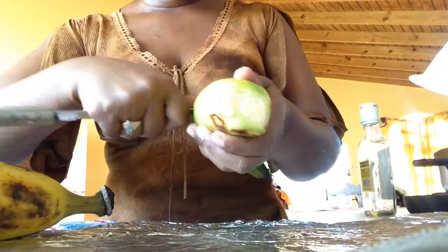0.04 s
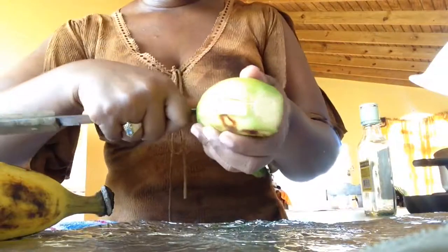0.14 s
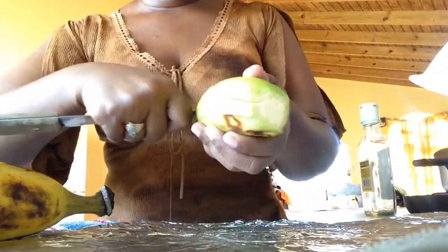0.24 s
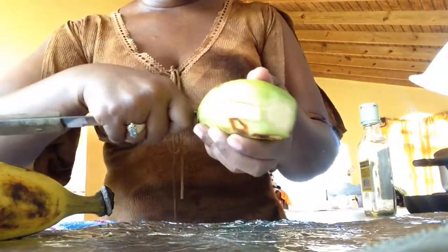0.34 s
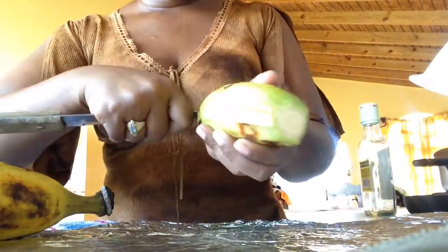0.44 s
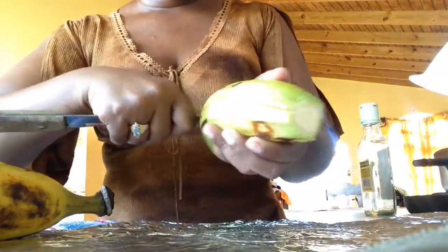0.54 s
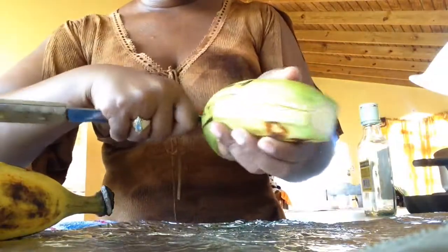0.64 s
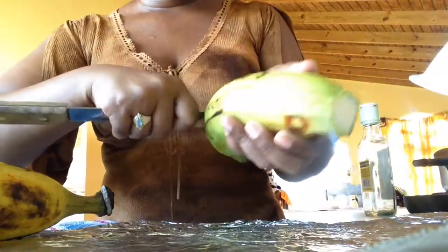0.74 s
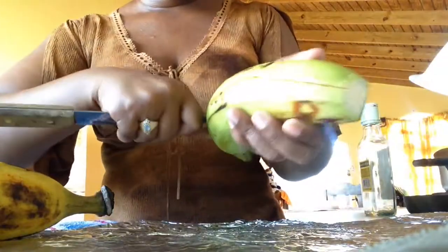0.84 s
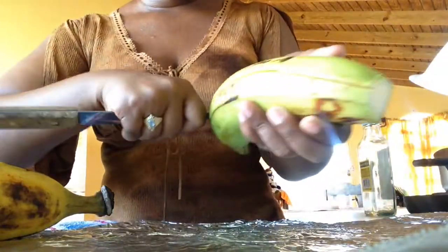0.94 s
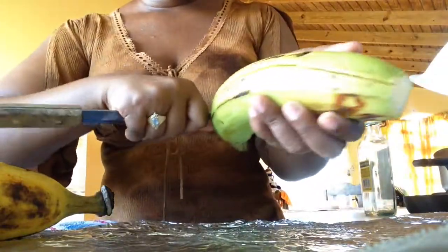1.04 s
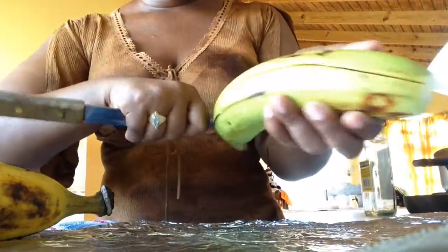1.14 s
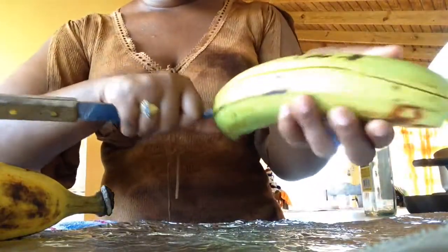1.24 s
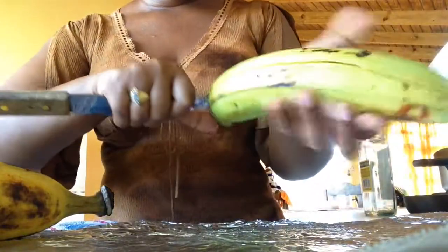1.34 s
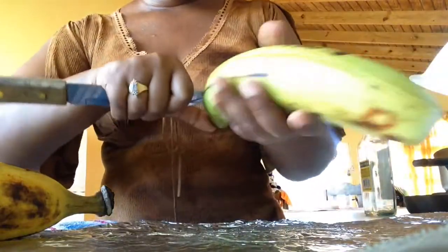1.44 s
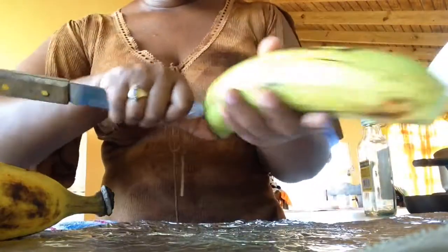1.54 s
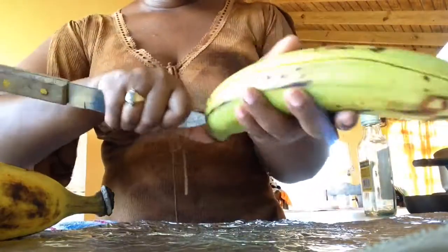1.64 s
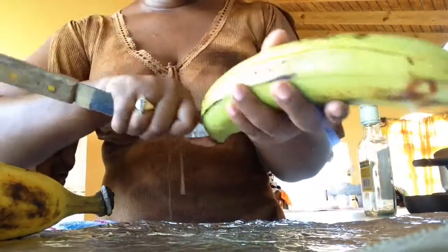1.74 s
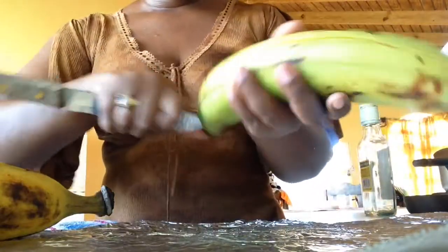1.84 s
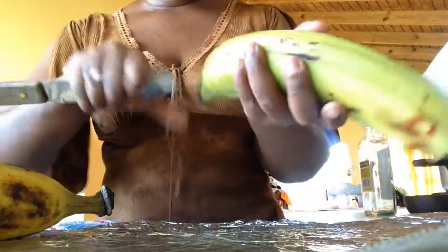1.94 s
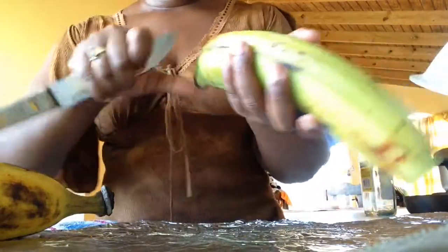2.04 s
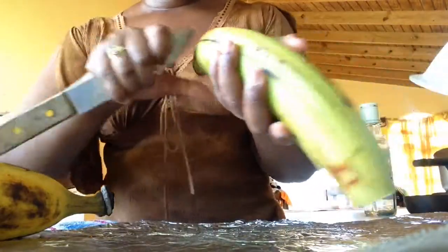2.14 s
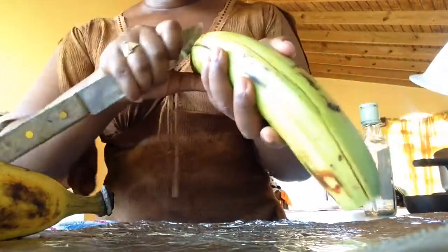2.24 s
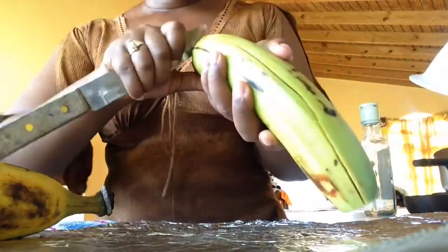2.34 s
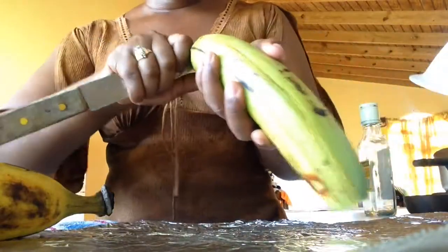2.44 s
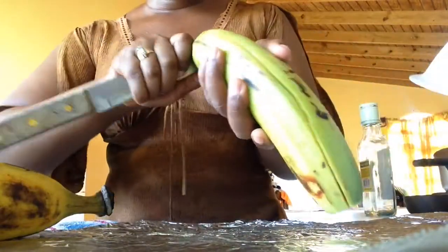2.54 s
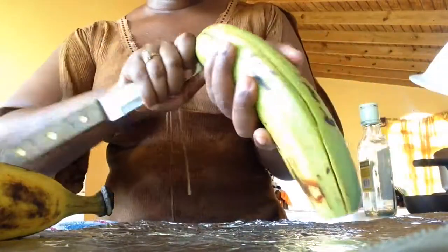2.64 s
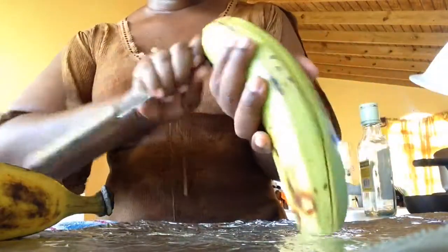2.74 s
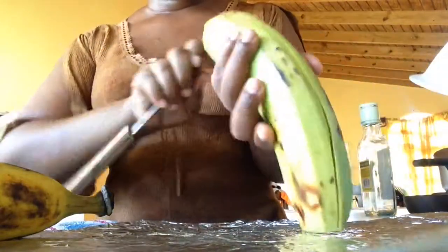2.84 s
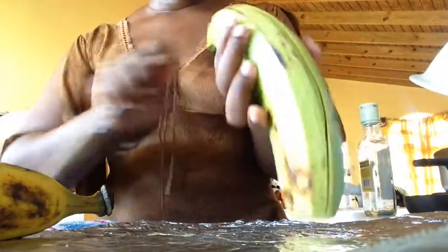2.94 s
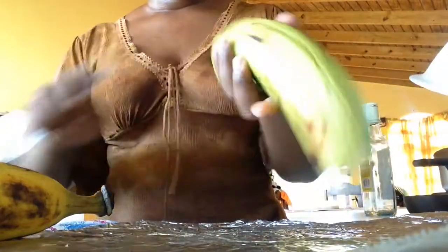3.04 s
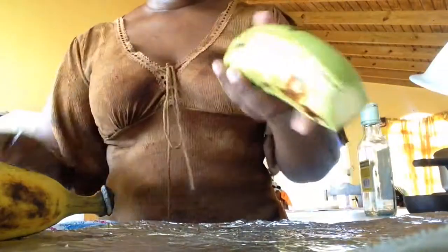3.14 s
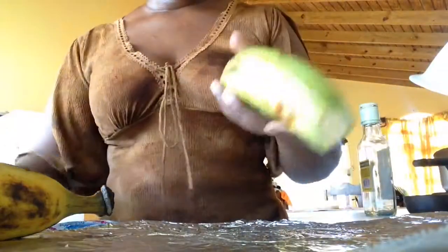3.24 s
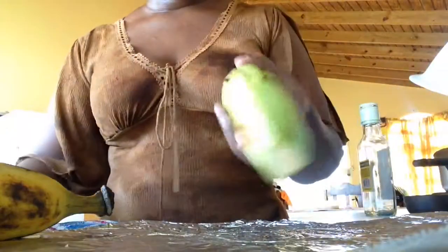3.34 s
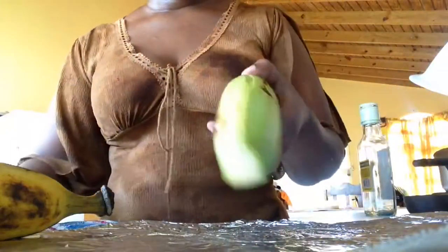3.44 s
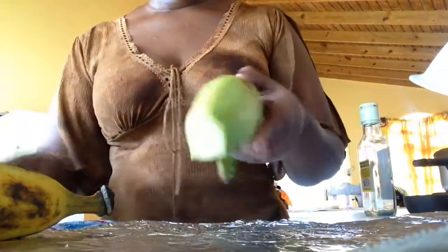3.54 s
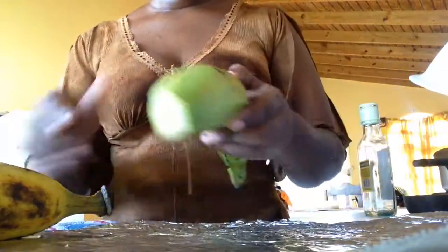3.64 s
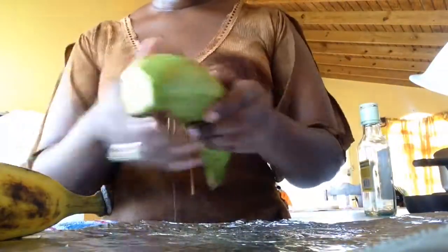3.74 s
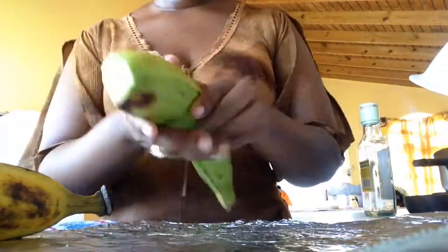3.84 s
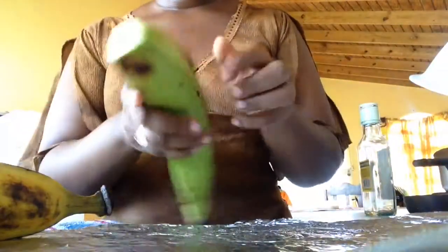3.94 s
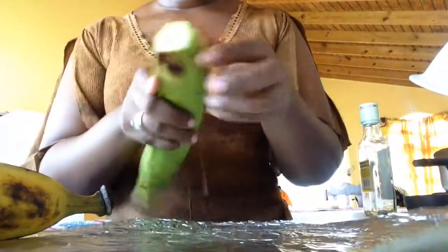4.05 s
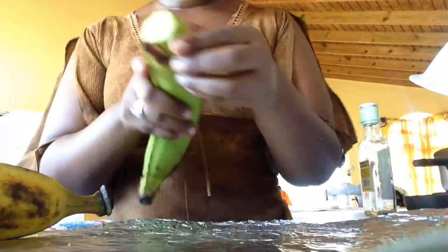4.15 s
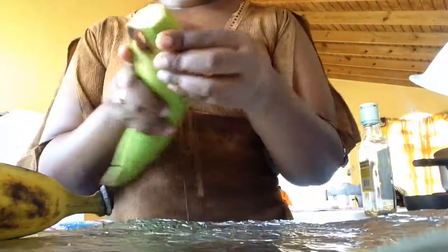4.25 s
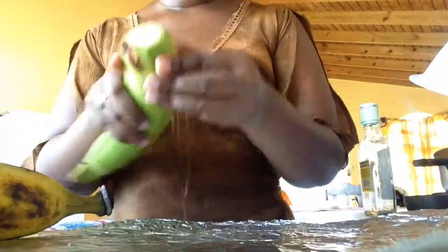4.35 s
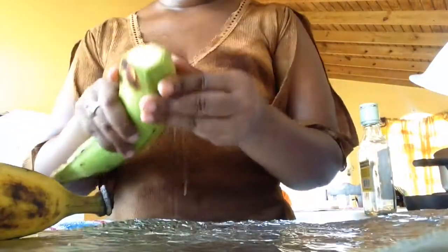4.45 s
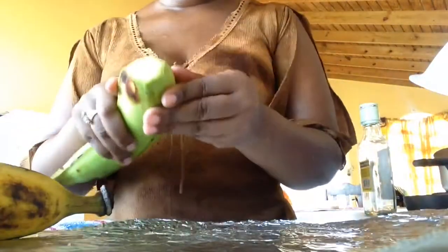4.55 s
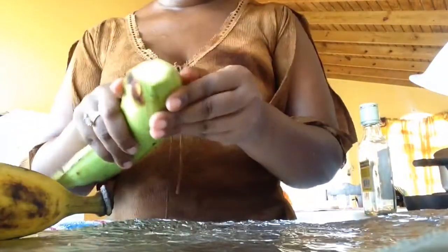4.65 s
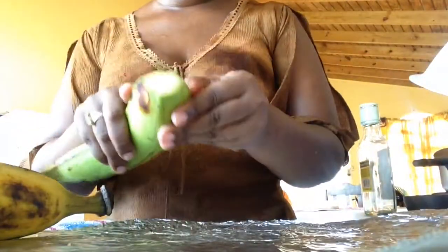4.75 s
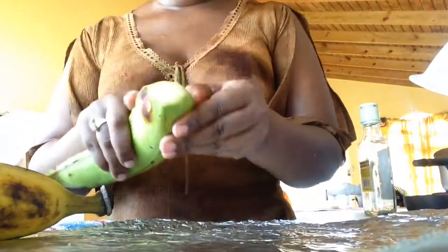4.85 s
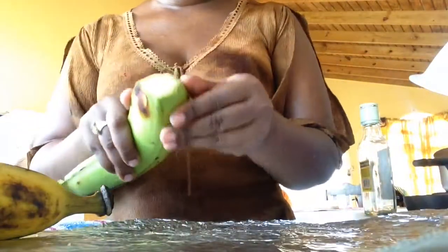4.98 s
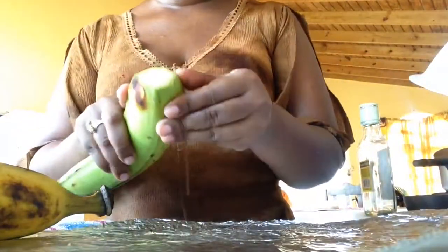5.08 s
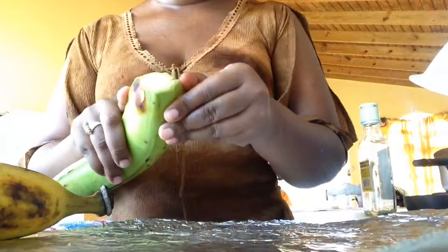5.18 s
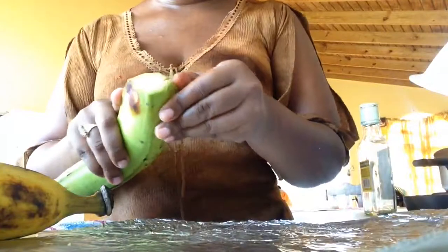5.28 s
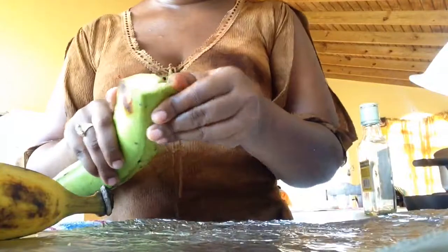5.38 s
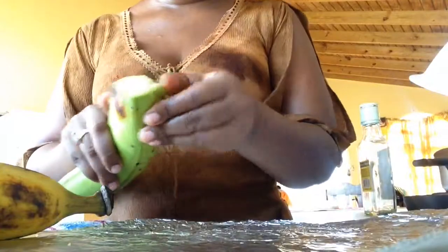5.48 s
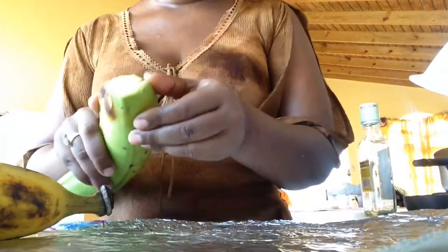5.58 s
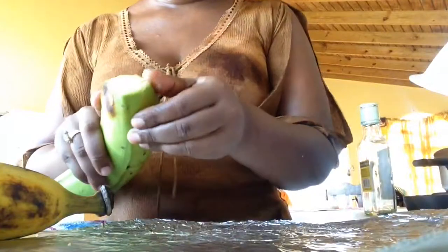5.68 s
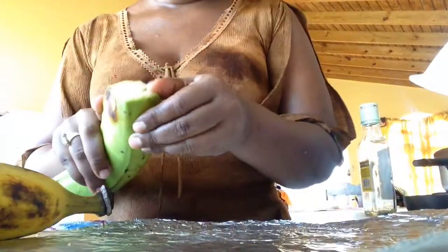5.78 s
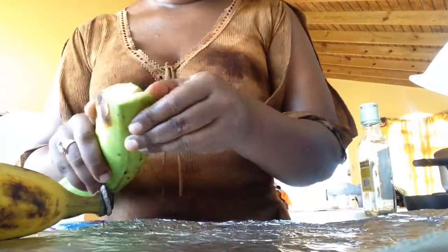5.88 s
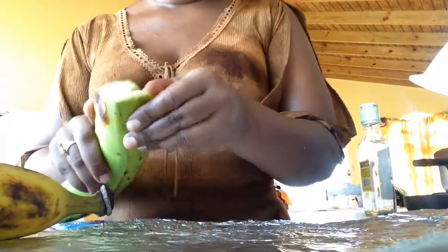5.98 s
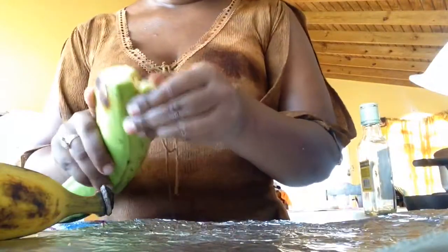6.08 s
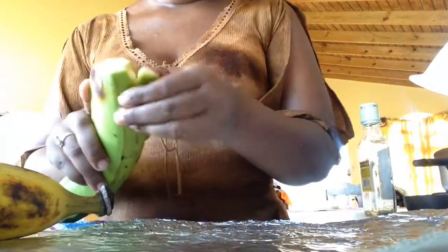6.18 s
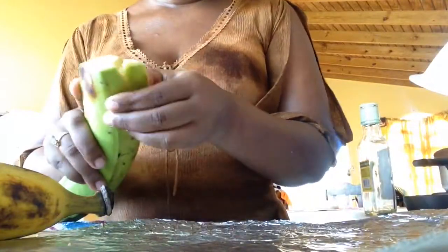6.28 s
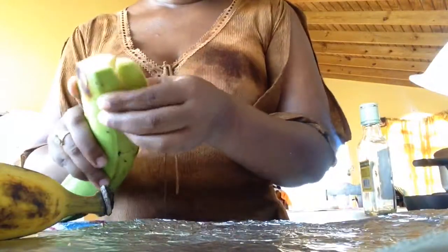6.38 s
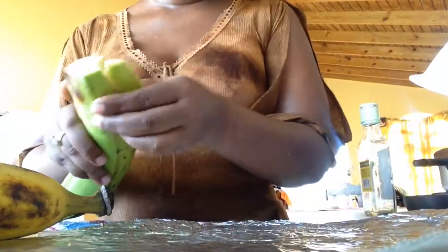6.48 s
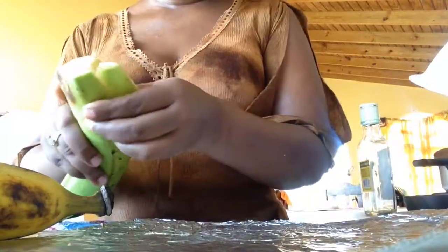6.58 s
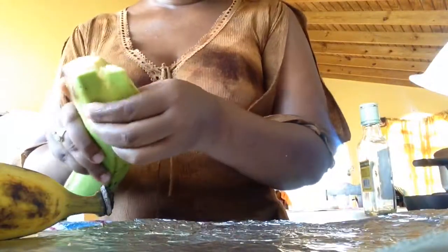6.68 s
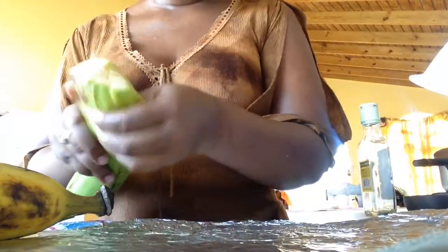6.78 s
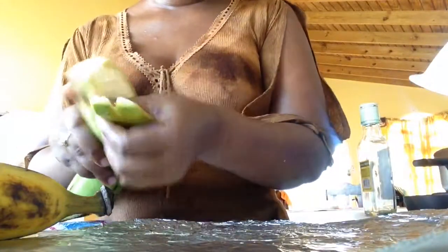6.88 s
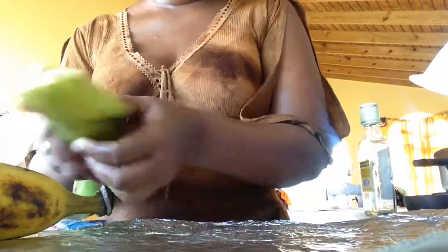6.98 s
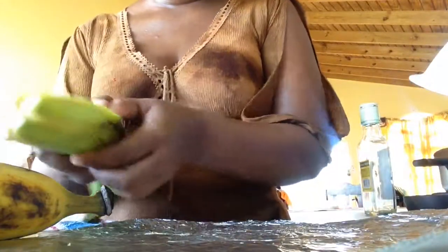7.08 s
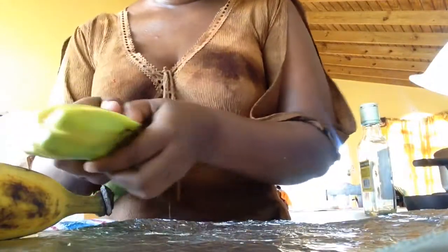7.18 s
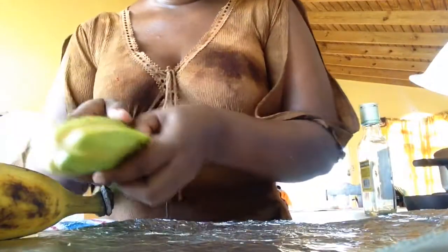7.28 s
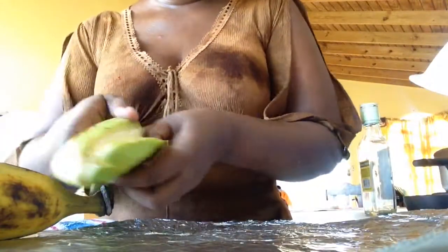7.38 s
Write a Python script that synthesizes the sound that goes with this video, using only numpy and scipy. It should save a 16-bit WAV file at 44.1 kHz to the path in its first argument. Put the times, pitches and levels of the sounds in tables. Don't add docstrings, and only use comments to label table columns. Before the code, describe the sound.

Close, dry scraping and snapping of thick peel in a quiet humming kitchen, interrupted by one loud cluster of wooden knocks and knife clatter.

```python
import sys
import numpy as np
from scipy import signal
from scipy.fft import rfft, irfft
from scipy.io import wavfile
from scipy.ndimage import uniform_filter1d

SR = 44100
rng = np.random.default_rng(int(sys.argv[2]) if len(sys.argv) > 2 else 0)


def elevation(decibels):
    levels = np.asarray(decibels, float)
    return 10 ** (levels / 20)


def transcribe(signal):
    frames = np.atleast_2d(signal).T
    limited = np.clip(frames, -1, 1)
    pcm = np.round(limited * 32767).astype(np.int16)
    wavfile.write(sys.argv[1], SR, pcm)


N = 327222

# frequency in [Hz], density in [dB per Hz].
HUM_SPECTRUM = [(15, -39), (25, -19), (108, 1), (195, -20), (451, -11.5), (659, -16.5), (1230, -20),
                (1610, -29), (1940, -25), (2910, -38), (3250, -30), (4030, -42.5), (5430, -36.5),
                (8140, -39.5), (16000, -38.5)]
# time in [s], gain in [dB].
STREET_SWELL = [(0, 0), (2, -2.2), (4.3, 1.1), (5, -0.6), (7.42, 0.4)]
# peak in [s], rise in [s], fall in [s], level in [dB].
WHIRR_SWELLS = [
    (.6, .7, .7, -80),
    (4.5, .6, 0.44, -79.5),
    (6.0, 0.96, .9, -79),
    (7.0, .6, .7, -72.5),
]
# frequency in [Hz], t60 in [s].
KITCHEN_T60 = [(80, .25), (150, 0.6), (400, 0.4), (1500, 0.27), (5000, 0.21), (14000, 0.26)]
# start in [s], peak in [dB], sway in [dB], upper modes in [dB],
# foil rattle in [dB].
TABLE_BLOWS = [
    (3.3876, -12, -15, -11, -12),
    (3.405, -14.5, -24, -10, -13),
    (3.419, -19, -16, -11, -9),
    (3.45, -23, -25, -12, -30),
    (3.478, -27.5, -12.5, -9.5, -6),
    (3.551, -15.5, -19, -10.5, -11),
    (3.6, -30, -20, -10, -30),
    (3.63, -36, -19, -21.5, -34),
    (3.986, -27, -24, -1, 0),
    (4.012, -28, -24, -8, -5),
]
# start in [s], peak in [dB], sway in [dB], upper modes in [dB],
# sway frequency in [Hz].
FRAME_BUMPS = [
    (1.705, -40, -6, -3, 90),
    (1.7135, -29, -2, -12, 62),
    (1.727, -32, -9, 0.5, 56.5),
    (2.845, -53, 8, -27, 73),
    (7.388, -59, -4, -16, 101),
]
# frequency in [Hz], level in [dB], t60 in [s].
TABLE_MODES = [(107, -2, .1), (191, -7, .08), (224, -8, .057), (266, -3, .06), (331, 1, .07), (352, 0, .05),
               (414, -5, .05), (461, -4, .07), (507, -7, .08), (590, -9, .06), (665, -9, .06),
               (726, -10, .06), (835, -11, .07), (1003, -13, .07)]
# frequency in [Hz], density in [dB per Hz].
UPPER_MODES = [(450, -22), (650, 2.5), (1000, -2), (1500, -11.5), (2200, -23), (3500, -30.5), (7000, -54)]
# frequency in [Hz], density in [dB per Hz].
FOIL_SPECTRUM = [(1500, -24), (2500, -14), (5300, -3.5), (9000, -7.5), (16000, -4.5)]
# start in [s], peak in [dB], frequency in [Hz], swell in [s].
HOLLOW_PUNCHES = [(3.3878, -11.5, 355, .007), (3.389, -35, 1007, .009), (3.404, -31, 790, .008),
                  (3.399, -22, 270, .01), (3.405, -26, 560, .008), (3.448, -27, 460, .008),
                  (3.5535, -26, 370, .008), (3.554, -35, 1170, .009), (3.574, -30, 290, .008),
                  (3.627, -35, 330, .008), (3.989, -33, 460, .012), (4.058, -36, 440, .008),
                  (1.766, -40, 1000, .004), (1.77, -39, 760, .014), (1.71, -42, 400, .012)]
# start in [s], peak in [dB], brightness in [dB per octave].
HANDLE_KNOCKS = [
    (1.727, -18, 2),
    (1.766, -24, -4.5),
    (1.776, -27, -3),
    (2.909, -49, -5),
]
# start in [s], peak in [dB], brightness in [dB per octave].
KNIFE_LANDING = [
    (3.551, -26.5, -0.5),
    (3.561, -31, 2.5),
    (3.576, -35, -1),
    (3.592, -40, 0),
    (3.627, -43.5, -1),
    (3.641, -48, 2),
]
# frequency in [Hz], level in [dB], t60 in [s].
HELD_KNIFE_MODES = [(750, 1, 0.09), (823, -1, 0.08), (1310, -5, .06), (1460, -6, 0.06), (1820, -3, 0.05),
                    (2200, -6, 0.06), (2900, 3, 0.022), (3900, -3, 0.03), (4700, -26, 0.075),
                    (5200, -22, 0.05)]
# frequency in [Hz], level in [dB], t60 in [s].
FREE_KNIFE_MODES = [(1180, 0, .1), (1500, -6, .06), (1765, -3, .16), (2370, -9, .08), (3060, 3, .03),
                    (3800, -3, .045), (4740, -15, .07), (5600, -16, .07)]
# start in [s], peak in [dB].
STEEL_CLINKS = [
    (3.1662, -26),
    (3.2105, -31),
    (3.251, -39),
    (3.29, -45),
]
# frequency in [Hz], level in [dB], t60 in [s].
BLADE_MODES = [
    [(5157, -5, 0.043), (7208, 0, 0.039), (7499, -25, 5.0), (8430, -4, 0.04), (10170, -10, 0.096),
     (10610, -3, 0.082), (12140, -10, 0.13), (12810, 0, 0.04), (13930, -11, 0.05), (15180, -14, 0.077)],
    [(5152, -6, 0.068), (6132, -15, 1.0), (6654, 0, 0.074), (7671, -5, 0.1), (9302, -2, 0.084),
     (10010, -10, 0.13), (10650, -8, 0.087), (10960, -8, 0.072), (13920, 0, 0.052), (15330, -18, 0.14)],
    [(4199, -14, 0.048), (8220, -16, 0.13), (9469, -18, 0.14), (11210, -5, 0.049), (11790, 0, 0.048),
     (12040, -15, 0.16), (15480, -19, 0.13)],
    [(5340, -17, 4.3), (5663, -9, 0.12), (6918, 0, 0.018), (7208, 0, 0.038), (12080, -27, 0.23),
     (15000, -30, 5.0)],
]
# time in [s], fizz in [dB], pocket in [dB].
PEEL_SLIPS = [(2.5858, -47, 1), (2.5985, -44, 1), (2.6036, -42, 0), (2.6135, -38, -2), (2.6171, -42, -7),
              (2.6213, -51, 2), (2.6234, -39, -6), (2.6258, -41, -5), (2.6277, -37, -9), (2.6307, -47, -1),
              (2.6367, -37, -4), (2.6416, -42, -8), (2.6434, -37, -5), (2.6509, -38, -5), (2.6605, -38, -2),
              (2.6692, -33, -6), (2.674, -39, -7), (2.6773, -42, 4), (2.6819, -37, -4), (2.6892, -39, 0),
              (2.6935, -40, -2), (2.6972, -42, -2), (2.7024, -36, -2), (2.7082, -49, -2), (2.7139, -31, -6),
              (2.7214, -36, -6), (2.7265, -29, -4), (2.7328, -36, -7), (2.7386, -40, -5), (2.749, -34, -6),
              (2.7576, -36, -5), (2.7652, -51, -2)]
# time in [s], resonance in [Hz].
PEEL_POCKET = [(2.58, 3200), (2.66, 3400), (2.77, 3600)]
# start in [s], peak above 8 kHz in [dB], middle in [dB], body under 2 kHz in [dB].
FIBRE_SNAPS = [(0.6534, -36.5, -16, -35), (0.6843, -38, -20, -26), (0.7454, -52, -10, -4),
               (1.1294, -42, -16, -26), (1.6073, -32.5, -30, -41), (1.914, -41.5, -18, -26),
               (1.9684, -49.5, 1, -19), (2.2627, -51, -11, -11), (2.443, -49, -11, -16),
               (2.457, -44, -8, -10), (2.4605, -40, -8, -15), (2.4748, -37, -16, -16),
               (2.4895, -38, -10, -14), (2.4945, -36, -10, -14), (2.5025, -28, -8, -12),
               (2.5293, -34, -14, -20), (2.5395, -35, -16, -20), (2.546, -40, -6, -16),
               (3.0825, -52, -16, -30), (3.283, -52, -16, -30), (3.316, -56, -12, -30),
               (3.328, -55, -12, -30), (3.354, -60, -6, -30), (2.7776, -42, -8, -28),
               (2.796, -29, -15, -32), (2.829, -30.5, -12, -26), (3.991, -25.5, -19, 0.5),
               (4.724, -50, -1, 7.5), (5.241, -38.5, 0, -30), (5.2438, -37, -13, -10),
               (5.4101, -33, -22, -28), (5.5647, -47, -24.5, -18), (5.7842, -50.5, -16.5, -8.5),
               (5.867, -50.5, -22, -12), (7.208, -43, -7, -28), (7.388, -40, -17, -28),
               (7.404, -41, -5, -20)]
# start in [s], peak above 8 kHz in [dB], depth of the crack in [dB].
STRIP_CRACKLE = [(6.0864, -23, 2.5), (6.0906, -23.5, -5), (6.1424, -38, 4.5), (6.2342, -36, -13),
                 (6.3295, -42.5, 0.5), (6.4137, -40, 7), (6.4694, -41, 13), (6.4852, -32, 4),
                 (6.5974, -41.5, 2), (6.611, -40, -10), (6.6408, -35, -2), (6.6749, -35, -0.5),
                 (6.6925, -28, 0.5), (6.7411, -27.5, -11), (6.7665, -28.5, -11), (6.828, -34.5, -8),
                 (6.8407, -25, 4), (6.8578, -13, 0.5), (6.8614, -19.5, 3.5), (6.8726, -22, -22),
                 (6.8754, -17, -9), (6.8882, -18, -4), (6.8902, -27, -1), (6.9064, -26.5, 5.5),
                 (6.9174, -31, 0), (6.9263, -22.5, -1), (6.9353, -26, -8), (7.1206, -45.5, 3),
                 (7.254, -36.5, -4), (7.3224, -35, 10.5)]
# frequency in [Hz], density in [dB per Hz].
FIZZ_SPECTRUM = [(8000, -37), (9500, -8), (11500, 0), (16000, -2)]
# frequency in [Hz], density in [dB per Hz].
SKIN_SPECTRUM = [(1760, -52.5), (3000, -9), (3640, 0), (5260, -0.5), (6290, 0.5), (9000, -2.5),
                 (11700, -33.5), (19800, -120)]
# peak in [s], rise in [s], fall in [s], pressure in [dB], body under 3 kHz in [dB].
PALM_RUBS = [
    (2.296, 0.034, 0.049, -63, -6),
    (2.775, 0.01, .06, -61, -7),
    (2.86, .07, .07, -55, -10),
    (3.292, 0.027, 0.16, -66.5, -8),
    (3.915, .02, 0.12, -66, -4),
    (3.942, .1, .015, -65, -4),
    (3.991, 0.0045, 0.16, -34, -6.5),
    (7.01, 0.053, 0.46, -65, 6),
    (7.324, .04, 0.026, -46, -17),
    (7.41, 0.16, .06, -47.5, -16),
]
# peak in [s], rise in [s], fall in [s], pressure in [dB], body under 3 kHz in [dB].
PEEL_TEARS = [(1.49, 0.18, 0.13, -64.5, 0), (3.082, .02, 0.083, -72.5, -3.5), (3.85, .015, .06, -80, -20),
              (4.157, .012, .06, -54, -18), (4.938, .055, 0.073, -63.5, -11),
              (5.002, 0.047, 0.035, -65.5, -9.5), (5.408, 0.033, 0.094, -59.5, -11.5),
              (6.05, 0.27, 0.059, -67, -18), (6.086, 0.023, 0.11, -46, -11), (6.23, 0.1, 0.17, -74.5, 7),
              (6.38, 0.18, .05, -64, -10), (6.418, 0.028, 0.13, -47.5, -8.5), (6.605, 0.017, 0.062, -62, 1),
              (6.7, 0.13, 0.02, -53.5, -6.5), (6.762, 0.23, .14, -64, 2),
              (6.858, 0.023, 0.074, -36.5, -7.5), (6.934, 0.055, 0.049, -45, -6.5),
              (7.28, 0.29, 0.13, -58, -17)]
# peak in [s], rise in [s], fall in [s], pressure in [dB], power of the flank.
TIP_BITE = (2.503, .018, .075, -33.5, 1.15)
# frequency in [Hz], density in [dB per Hz].
BITE_SPECTRUM = [(150, -44), (250, -20), (1500, -2), (1850, -5), (3230, -4), (5000, -8), (11700, -12),
                 (16000, -15)]
# peak in [s], rise in [s], fall in [s], pressure in [dB], power of the flank.
HAND_SWIPE = (4.06, .045, .075, -30, 1.35)
# peak in [s], rise in [s], fall in [s], pressure in [dB], fizz above 9 kHz in [dB].
SAW_STROKES = [(0.085, 0.041, 0.061, -52, 4.5), (.22, .12, .12, -74, 0), (.322, 0.035, 0.046, -51.5, -1.5),
               (.44, 0.036, 0.063, -62.5, 4.5), (0.556, 0.038, 0.06, -53.5, 0.5),
               (0.683, 0.082, 0.035, -59, 3), (.748, 0.02, 0.086, -68, 0), (.858, 0.031, 0.049, -49.5, 5),
               (.955, .04, .13, -63.5, 12), (1.086, 0.049, 0.064, -61, 14), (1.178, 0.037, 0.088, -62, 14),
               (1.24, 0.031, 0.019, -68.5, 14.5), (1.661, 0.066, 0.3, -64.5, 10),
               (1.73, .015, 0.025, -49, -15), (1.786, 0.085, 0.07, -58.5, 1),
               (1.977, 0.052, 0.0076, -59.5, -3)]
# frequency in [Hz], density in [dB per Hz].
BLADE_SPECTRUM = [(120, -48), (200, -29), (344, 4.5), (774, -4.5), (1210, 7), (1350, -1), (3150, 3.5),
                  (4190, -5.5), (4910, -9.5), (9000, -16), (11700, -47), (19800, -120)]
# frequency in [Hz], width in [Hz], level in [dB].
SAWING_RINGS = [(328, 11.5, -8.5), (1170, 190, -28), (3070, 310, -41), (5120, 340, .4)]


def evened(x):
    return x / np.sqrt(np.mean(x ** 2) + 1e-20)


def peaked(x):
    return x / abs(x).max()


def read(points, hz):
    f, value = np.transpose(points)
    return np.interp(np.log(hz + 1), np.log(f + 1), value)


def add(mix, start_s, sound):
    part = mix[round(start_s * SR):][:len(sound)]
    part += sound[:len(part)]


def coloured(x, points):
    gain = elevation(read(points, np.fft.rfftfreq(len(x), 1 / SR)))
    return evened(irfft(rfft(x) * gain, len(x)))


def resonate(x, hz, width_hz):
    turn = np.exp(2j * np.pi * np.cumsum(hz * np.ones(len(x))) / SR)
    r = np.exp(-np.pi * width_hz / SR)
    return 2 * (turn * signal.lfilter([1 - r], [1, -r], x / turn + 1e-18)).real


def smoothed(x, rows, columns):
    return uniform_filter1d(uniform_filter1d(x, size=rows, axis=0), size=columns, axis=1)


def patchy(x, patch_db):
    z = signal.stft(x, nperseg=256)[2]
    field = evened(smoothed(rng.standard_normal(z.shape), 6, 14))
    return evened(signal.istft(z * elevation(patch_db * field), nperseg=256)[1][:len(x)])


def friction(grit_db, n, per_s, grain_ms):
    catches = elevation(grit_db * np.minimum(rng.exponential(1, n), 4)) * (rng.random(n) < per_s / SR)
    power = signal.lfilter([1], [1, -np.exp(-1000 / (grain_ms * SR))], catches ** 2) + 0.9
    power /= uniform_filter1d(power, size=1500)
    return np.sqrt(power) * rng.standard_normal(n)


def stroke(peak_s, rise_s, fall_s, db, curve):
    t = np.arange(N) / SR - peak_s
    u = np.minimum(np.where(t < 0, -t / rise_s, t / fall_s), 4)
    return elevation(db - 30 * u ** curve)


def ring(modes, t, spread_db, rough=0., size=40):
    hz, db, t60 = np.transpose(modes)[:, :, None]
    level_luck, pitch_luck, sign_luck = rng.standard_normal((len(hz), 3)).T[:, :, None]
    height = np.sign(sign_luck) * elevation(db + spread_db * level_luck)
    rattle = evened(uniform_filter1d(rng.standard_normal((len(hz), len(t))), size=size, axis=1))
    flutter = 1 - rough + rough * rattle
    tone = np.sin(2 * np.pi * hz * (1 + 0.0093 * pitch_luck) * t)
    return height * flutter * elevation(-60 * t / t60) * tone


def hum():
    frames, hz = N // 256 + 5, np.fft.rfftfreq(1024, 1 / SR)
    a, b, patches = rng.standard_normal((frames, 513, 3)).T
    patches = evened(smoothed(patches, 8, 16))
    swell_db = np.interp(np.arange(frames) * 256 / SR, *np.transpose(STREET_SWELL)) * (hz[:, None] < 2000)
    z = (a + 1j * b) * elevation(read(HUM_SPECTRUM, hz)[:, None] + 1.6 * patches + swell_db)
    return elevation(-66.5) * evened(signal.istft(z, nperseg=1024, noverlap=768)[1][:N])


def whirr():
    centre_hz, width_hz, waver_hz = 1300, 60, 90
    waver = evened(uniform_filter1d(uniform_filter1d(rng.standard_normal(N), size=4000), size=4000))
    hz = centre_hz + waver_hz * waver
    band = resonate(resonate(rng.standard_normal(N), hz, width_hz), hz, width_hz)
    return patchy(band, 3.0) * sum(stroke(*row, 2) for row in WHIRR_SWELLS)


def kitchen(x):
    taps = np.zeros(SR)
    at = np.arange(200, SR - 20, 20)
    taps[at + rng.integers(0, 20, len(at))] = rng.choice([-1., 1.], len(at))
    hz, t, z = signal.stft(taps, SR, nperseg=512)
    tail = signal.istft(z * elevation(-60 * t / read(KITCHEN_T60, hz)[:, None]), SR, nperseg=512)[1]
    return signal.fftconvolve(x, tail / np.linalg.norm(tail))[:N]


def table():
    out, t = np.zeros(N), np.arange(SR // 2) / SR
    blow_sway_hz, bump_foil_db = 114.5, -27
    hits = [(*blow, blow_sway_hz) for blow in TABLE_BLOWS]
    hits += [(*bump, bump_foil_db, hz) for *bump, hz in FRAME_BUMPS]
    for s, db, sway_db, upper_db, foil_db, sway_hz in hits:
        sway = -np.sin(2 * np.pi * sway_hz * t) * elevation(sway_db + 11.5 - 60 * t / 0.072)
        upper = coloured(rng.standard_normal(len(t)), UPPER_MODES) * elevation(upper_db - 2 - 60 * t / 0.083)
        top = peaked(ring(TABLE_MODES, t, 1.3).sum(0))
        wood = (sway + top + upper) * (1 - np.exp(-t / 0.0042))
        foil = coloured(friction(2.6, len(t), 500, 0.9), FOIL_SPECTRUM)
        foil = foil * elevation(foil_db - 15 - 60 * t / 0.085) * (1 - np.exp(-(t / .005) ** 2))
        add(out, s, elevation(db - 1) * (wood + foil))
    return out


def punches():
    out, t = np.zeros(N), np.arange(SR // 8) / SR
    for s, db, hz, swell_s in HOLLOW_PUNCHES:
        u = t / swell_s
        add(out, s, -elevation(db) * u * np.exp(.5 - .5 * u ** 2) * np.sin(2 * np.pi * hz * t))
    return out


def handle():
    out, t = np.zeros(N), np.arange(SR // 3) / SR
    hits = [(*k, HELD_KNIFE_MODES) for k in HANDLE_KNOCKS] + [(*k, FREE_KNIFE_MODES) for k in KNIFE_LANDING]
    for s, db, tilt_db, modes in hits:
        octaves = np.log2(np.transpose(modes)[0] / 1500)
        rings = peaked(elevation(tilt_db * octaves) @ ring(modes, t, 1.5, rough=.3, size=300))
        colour = [(400, -28.5), (800, -tilt_db), (4000, tilt_db - 13.5), (8000, -45)]
        clatter = coloured(rng.standard_normal(len(t)), colour) * elevation(-8.5 - 60 * t / 0.07)
        add(out, s, elevation(db - 6.5) * (rings + clatter) * (1 - np.exp(-t / 0.0014)))
    return out


def clinks():
    out, t = np.zeros(N), np.arange(8000) / SR
    longest_s = .06
    for (s, db), modes in zip(STEEL_CLINKS, BLADE_MODES):
        foil = coloured(rng.standard_normal(len(t)), [(3000, -26), (4500, -10), (6500, 0.5), (15000, 2.5)])
        foil = foil * elevation(-60 * t / 0.09)
        damped = [(hz, g, min(t60, longest_s)) for hz, g, t60 in modes]
        steel = peaked(ring(damped, t, 1.0, rough=.65, size=50).sum(0))
        add(out, s, elevation(db - 5) * (steel + elevation(-14) * foil) * (1 - np.exp(-t / .0006)))
    return out


def creak():
    t = np.arange(N) / SR
    drag = elevation(-58) * rng.standard_normal(N) * (abs(t - 2.675) < .09)
    spits, pushes = drag.copy(), elevation(-3) * drag
    for s, db, pocket_db in PEEL_SLIPS:
        slip = elevation(-60 * t[:500] / np.array([[.007], [.013]])) * rng.standard_normal((2, 500))
        add(spits, s, elevation(db) * slip[0])
        add(pushes, s, elevation(db + pocket_db) * slip[1])
    fizz = elevation(5.5) * resonate(resonate(spits, 11600, 3400), 11600, 3400)
    fizz += elevation(2.5) * resonate(spits, 15200, 1500) + resonate(spits, 8700, 400)
    pocket_hz = np.interp(t, *np.transpose(PEEL_POCKET))
    pocket = elevation(14.5) * resonate(resonate(pushes, pocket_hz, 850), pocket_hz, 850)
    flesh = elevation(-19) * pushes + elevation(4) * resonate(pushes, 600, 500) + elevation(-3) * resonate(pushes, 5200, 400)
    return flesh + fizz + pocket


def snaps():
    out, t = np.zeros(N), np.arange(2048) / SR
    crack, hiss = elevation(-60 * t / .007), elevation(-11 - 60 * t / .025)
    fade = (crack + hiss) * (1 - np.exp(-t / .0003))
    middle_base_db, body_base_db = -12, -24.5
    crackle = [(s, db, middle_base_db + d, body_base_db + d / 2) for s, db, d in STRIP_CRACKLE]
    for s, db, middle_db, body_db in FIBRE_SNAPS + crackle:
        noise = rng.standard_normal(len(t))
        top = peaked(fade * coloured(noise, FIZZ_SPECTRUM))
        middle = peaked(fade * coloured(noise, [(1300, -21), (2200, -1.5), (7500, -1), (9500, -8.5)]))
        body = peaked(fade * coloured(noise, [(200, -31), (400, 0), (1500, -1.5), (2400, -25.5)]))
        add(out, s, elevation(db - 2.5) * (top + elevation(middle_db + 5.5) * middle + elevation(body_db + 6.5) * body))
    return out


def hands():
    drag = patchy(friction(1.9, N, 700, .8), 2.6)
    body = coloured(drag, [(150, -29), (300, -2.5), (700, 5.5), (1500, 4), (2800, -4), (3600, -21.5)])
    hiss, fizz = coloured(drag, SKIN_SPECTRUM), coloured(drag, FIZZ_SPECTRUM)
    out = stroke(*TIP_BITE) * coloured(drag, BITE_SPECTRUM)
    out += stroke(*HAND_SWIPE) * (hiss + elevation(-12) * body + elevation(4) * fizz)
    for rows, fizz_db in ((PALM_RUBS, -2.5), (PEEL_TEARS, 5.5)):
        for *row, body_db in rows:
            out += stroke(*row, 0.85) * (hiss + elevation(body_db) * body + elevation(fizz_db) * fizz)
    return out


def knife():
    drag = patchy(friction(1.7, N, 900, .6), 2.0)
    peaks = np.transpose(SAW_STROKES)[0]
    which = np.searchsorted((peaks[1:] + peaks[:-1]) / 2, np.arange(N) / SR)
    bend = rng.uniform(.97, 1.03, len(peaks))[which]
    hiss = coloured(drag, BLADE_SPECTRUM)
    rings = sum(elevation(g) * evened(resonate(hiss, hz * bend, w)) for hz, w, g in SAWING_RINGS)
    low = evened(hiss + rings)
    fizz = coloured(drag, [(8000, -17), (10300, -12.5), (11500, -5.5), (16000, -1)])
    return sum(stroke(*row, 2.02) * (low + elevation(fizz_db) * fizz) for *row, fizz_db in SAW_STROKES)


def scene():
    fruit = knife() + hands() + snaps() + creak() + clinks()
    wood, steel, punch = table(), handle(), punches()
    echoes = kitchen(elevation(-13.5) * fruit + elevation(-6) * wood + elevation(-9) * steel + elevation(-14) * punch)
    return (fruit + wood + steel + punch + echoes + hum() + whirr())[None]


def band_limit(x):
    return signal.sosfilt(signal.butter(12, 17000, fs=SR, output="sos"), x)


def record(dry):
    thin = signal.sosfilt(signal.butter(3, 42, "high", fs=SR, output="sos"), dry)
    edge = signal.firwin(511, 15750, window=("kaiser", 9), fs=SR)
    mix = signal.oaconvolve(thin, edge[None], "same")
    return band_limit(mix)


dry = scene()
out = record(dry)
transcribe(out)
```